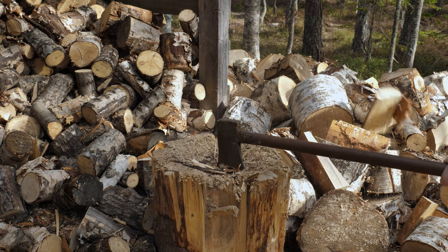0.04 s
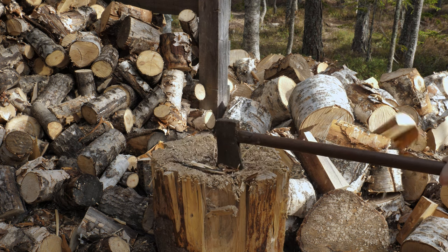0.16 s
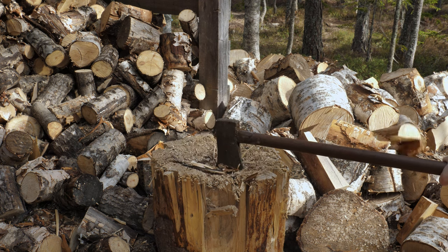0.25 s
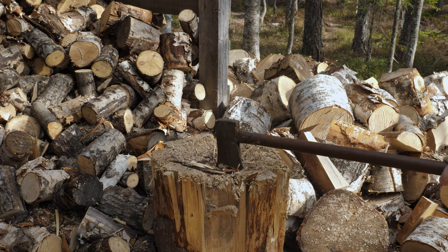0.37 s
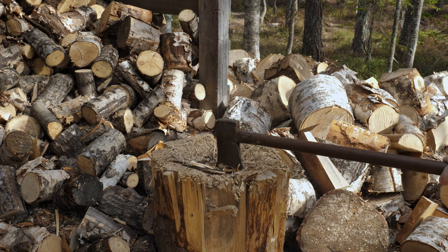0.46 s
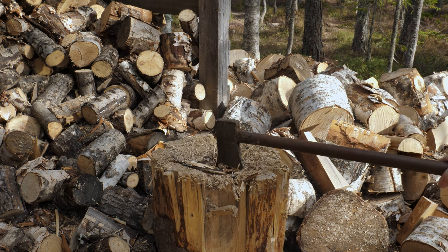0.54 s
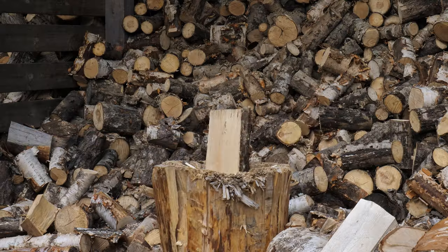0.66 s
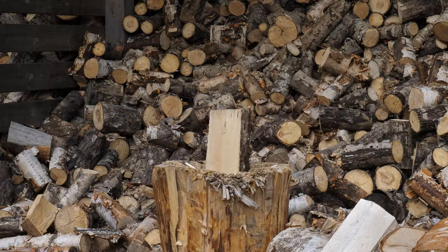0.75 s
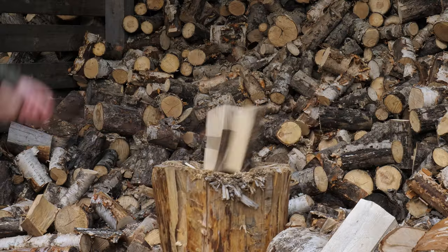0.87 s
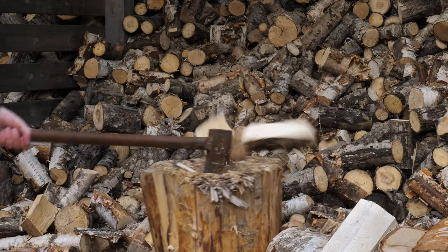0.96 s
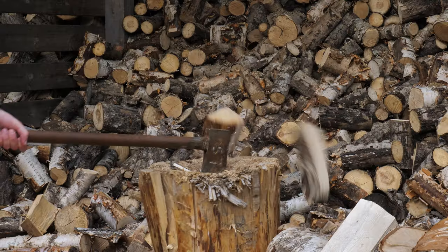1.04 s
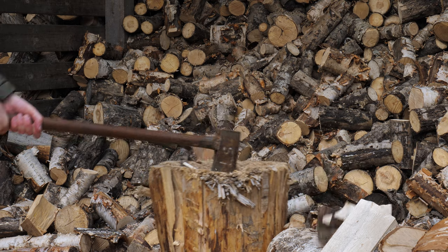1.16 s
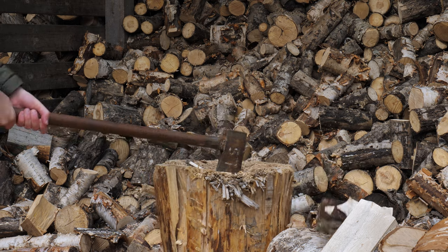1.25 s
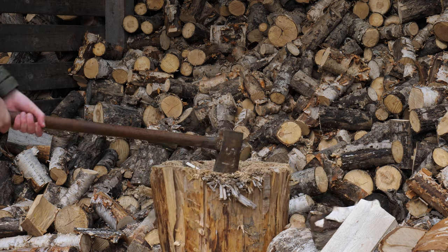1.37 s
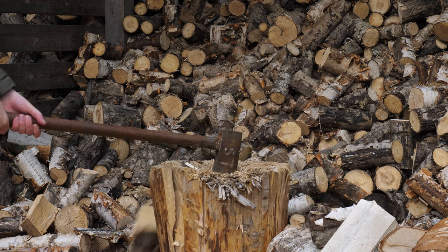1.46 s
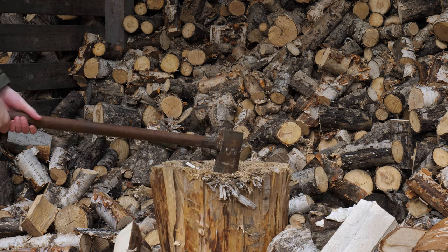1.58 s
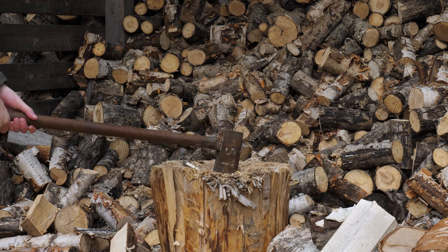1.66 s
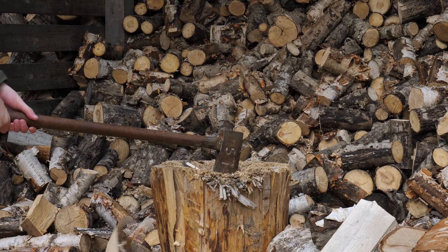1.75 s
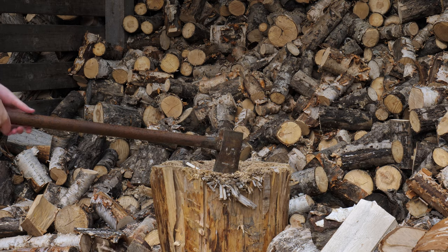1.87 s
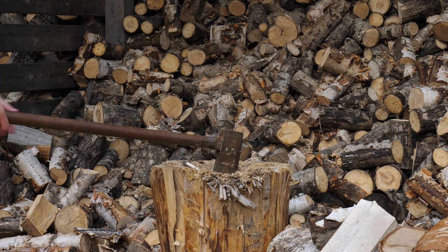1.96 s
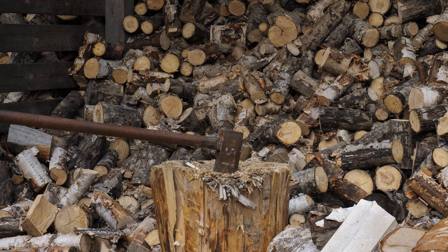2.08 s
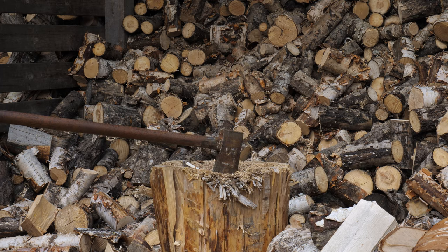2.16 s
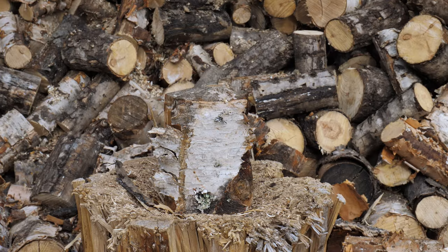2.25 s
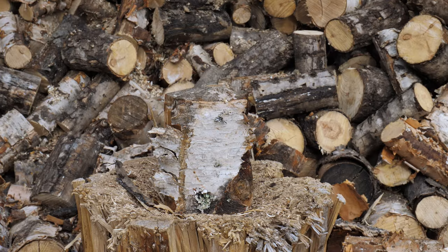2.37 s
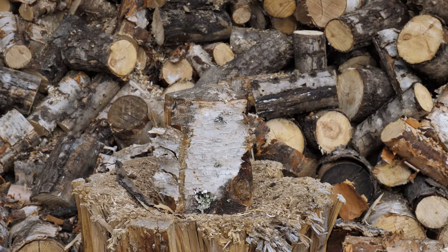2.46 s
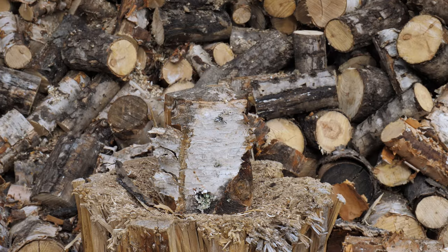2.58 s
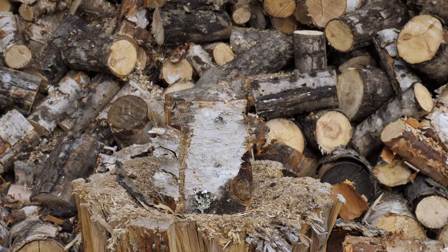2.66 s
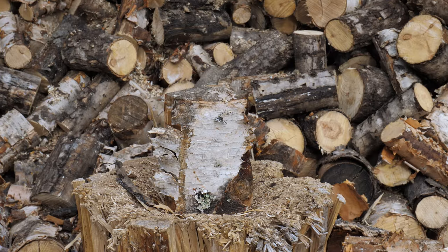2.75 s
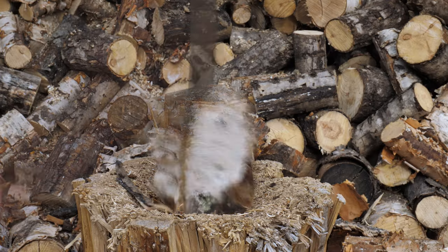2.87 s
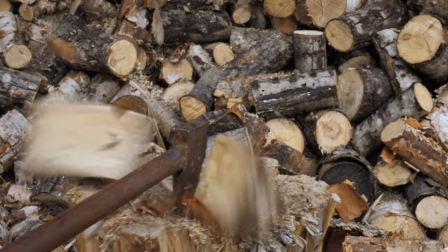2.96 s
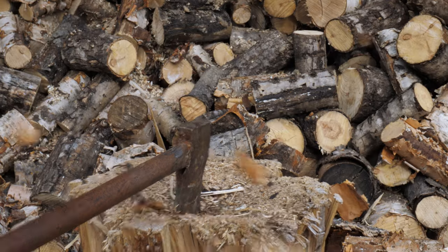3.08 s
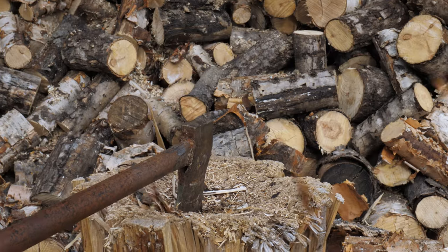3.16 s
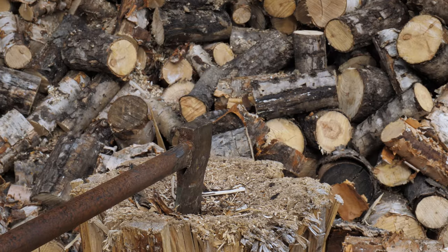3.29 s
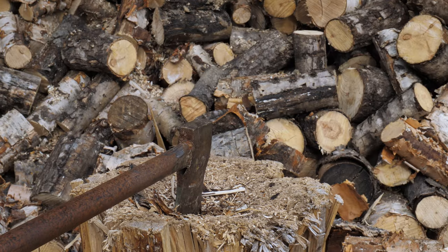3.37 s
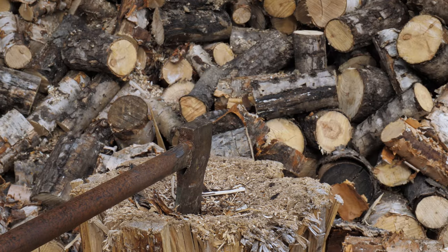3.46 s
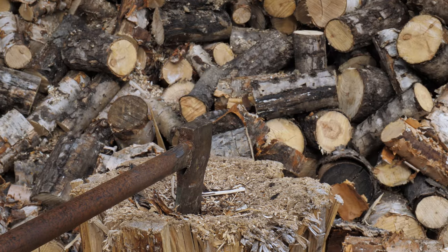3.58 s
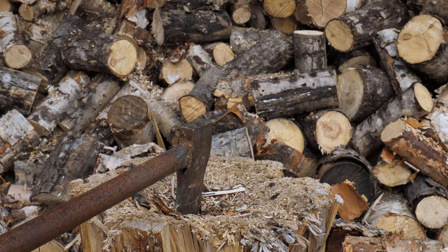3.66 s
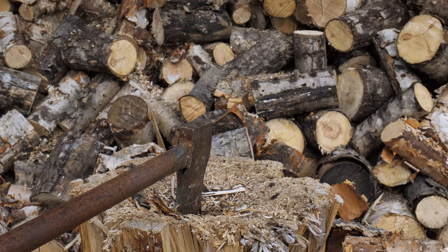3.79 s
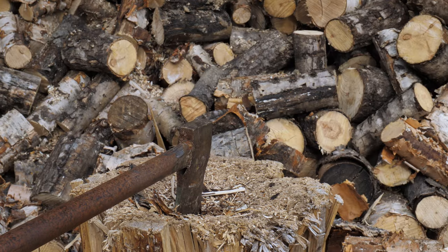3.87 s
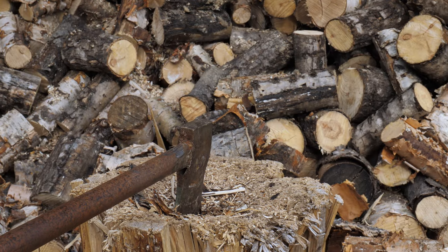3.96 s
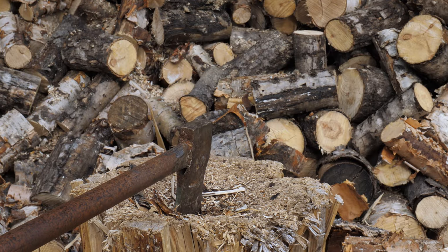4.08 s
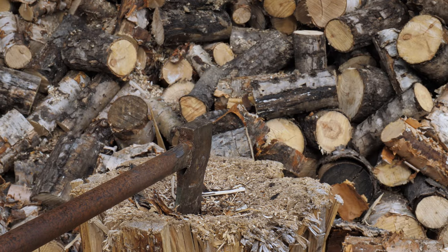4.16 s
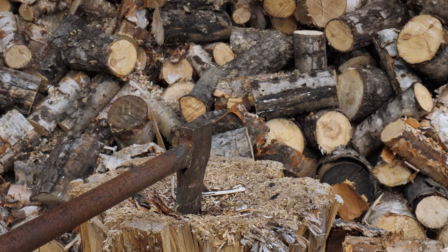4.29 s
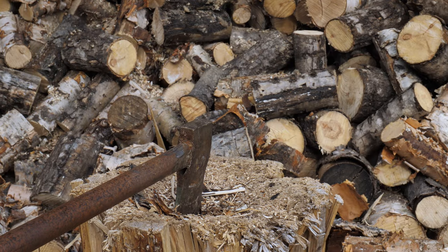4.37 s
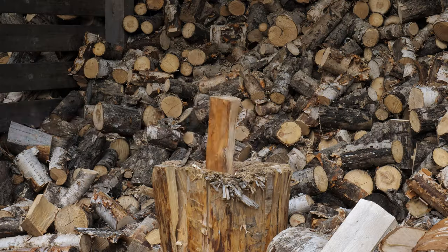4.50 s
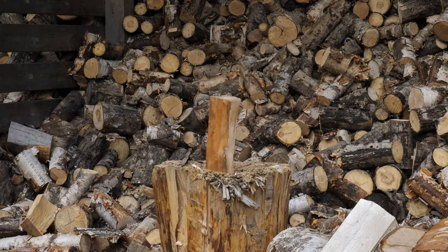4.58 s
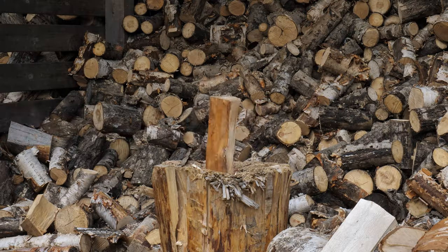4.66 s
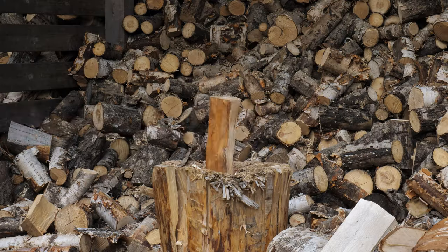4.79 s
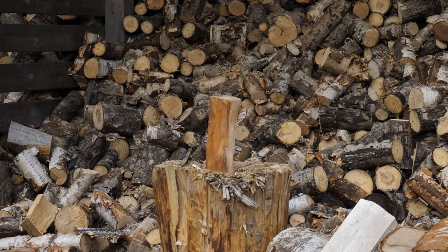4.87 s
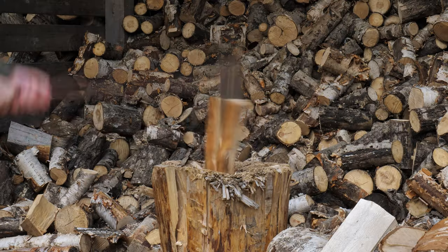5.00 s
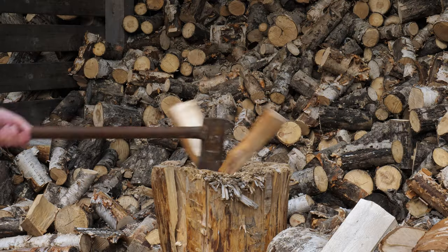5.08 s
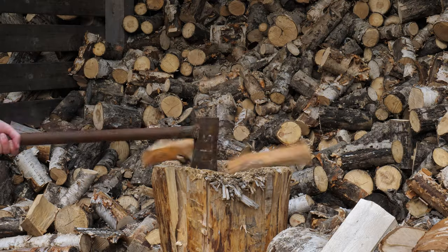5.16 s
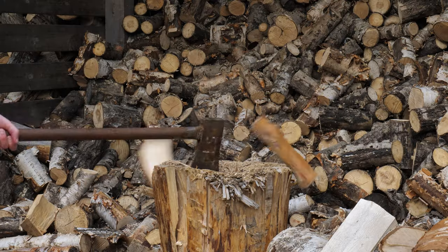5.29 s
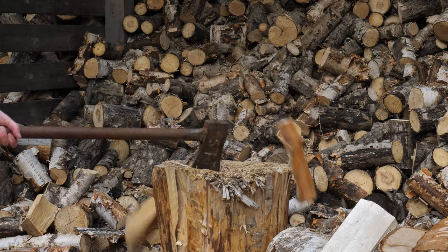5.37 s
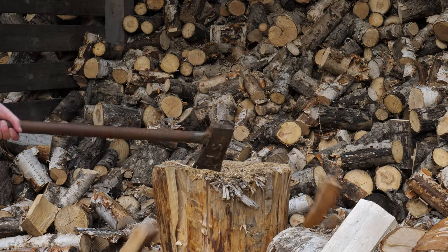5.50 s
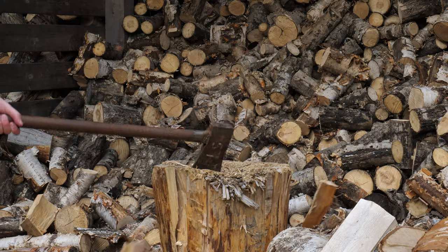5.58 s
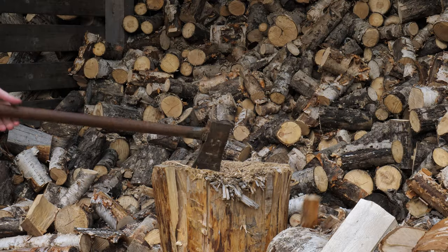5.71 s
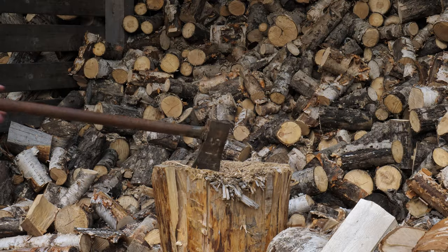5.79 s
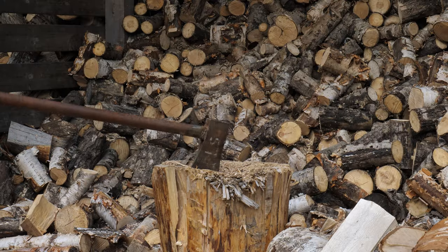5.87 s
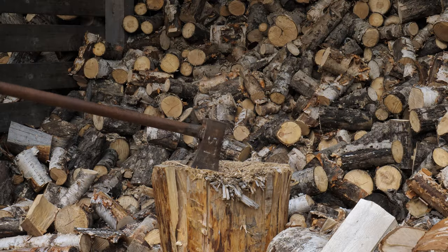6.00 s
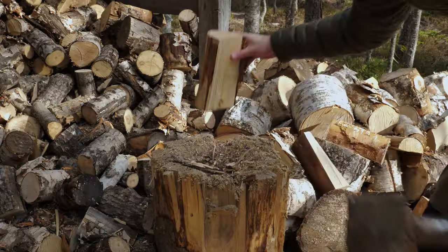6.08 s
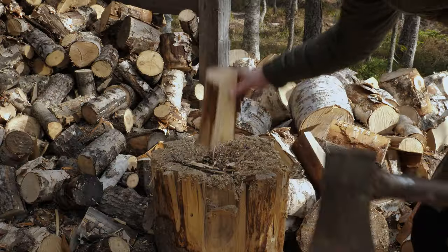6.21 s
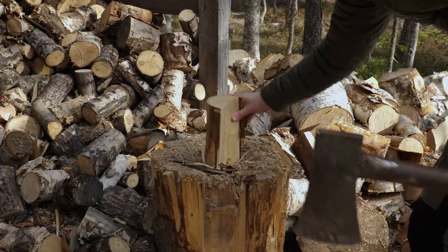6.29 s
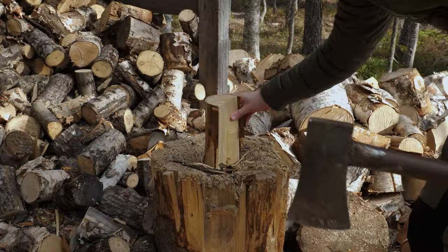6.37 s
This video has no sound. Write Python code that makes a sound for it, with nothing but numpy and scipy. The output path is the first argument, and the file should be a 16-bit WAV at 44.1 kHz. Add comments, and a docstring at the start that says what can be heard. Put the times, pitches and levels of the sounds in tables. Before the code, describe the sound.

The sound starts mid-tumble: from 0 to 0.6 s split wood knocks hollowly onto a pile, with bright chip ticks and scraping bark. At 0.7 s the background jumps to windier air. At 0.94 s an axe tears through a log with a rough crack and a low block thump, harshly overloaded; halves knock until about 1.9 s under swelling low wind buffets. From 2.26 s it is calmer, a hush rising faintly with a barely audible wavering tone. At 2.95 s comes the fiercest crack, then a loud knock at 3.3 s and dense clatter, chips and trickling bark until 4.25 s. After another change at 4.56 s, wind rumbles strongly; the third blow at 5.07 s is thumpier, its pieces knocking at 5.27 and 5.5 s. The last shot begins at 6.14 s, quieter, with one sharp clicking wooden knock at 6.33 s. Forest hush throughout, with short woodpile scatter and faint tree echoes.

```python
"""Splitting birch logs outdoors

An axe splits logs on a block, in five short shots; the halves knock and tumble on a woodpile.
Each blow cracks the log (bursts of noise), then thumps the block (low fading tones), and overloads the input.
Pieces and chips ring at their own pitches; bark trickles and scrapes as small bursts of noise.
Wind, made of slow uneven noise, buffets the microphone over a smooth forest hush."""
import sys
import numpy as np
from scipy import signal
from scipy.fft import rfft, irfft
from scipy.io import wavfile
from scipy.ndimage import uniform_filter1d

SR = 44100
rng = np.random.default_rng(int(sys.argv[2]) if len(sys.argv) > 2 else 0)


def elevation(decibels):
    """Turn decibel levels (scalar or array-like) into linear amplitude ratios."""
    levels = np.asarray(decibels, float)
    return 10 ** (levels / 20)


def log_audio(samples):
    """Write samples as a 16-bit WAV file to the path given in sys.argv[1]."""
    # one column per channel
    frames = np.atleast_2d(samples).T
    # limit to full scale, then quantise
    limited = np.clip(frames, -1, 1)
    pcm = np.round(limited * 32767).astype(np.int16)
    wavfile.write(sys.argv[1], SR, pcm)


N = 284004
T = np.arange(N) / SR  # time [s]


def colour(x, points, band_hz):
    """Shape the spectrum of x by (frequency [Hz], level [dB]) points; rms 1 within the band."""
    hz = np.maximum(np.fft.rfftfreq(len(x), 1 / SR), 1)
    point_hz, point_db = np.transpose(points)
    spectrum = rfft(x) * elevation(np.interp(np.log(hz), np.log(point_hz), point_db))
    inside = (hz > band_hz[0]) & (hz < band_hz[1])
    rms = np.sqrt(2 * np.sum(np.abs(spectrum[inside]) ** 2)) / len(x)
    return irfft(spectrum, len(x)) / rms


def walk(rate):
    """Random levels held 1 / rate s and smoothed twice; spread 1."""
    k = int(SR / rate)
    steps = np.repeat(rng.standard_normal(N // k + 1), k)
    slow = uniform_filter1d(uniform_filter1d(steps, k), k)[:N]
    return slow / slow.std()


def band(x, lo_hz, hi_hz):
    """Keep a band of frequencies, scaled to rms 1 for white noise."""
    edges = [lo_hz, min(hi_hz, 0.45 * SR)]
    y = signal.sosfilt(signal.butter(2, edges, "bandpass", fs=SR, output="sos"), x)
    return y / np.sqrt(2 * (hi_hz - lo_hz) / SR)


def lowpass(x, hz):
    """The dull part of a sound, below hz."""
    return signal.sosfilt(signal.butter(2, hz, fs=SR, output="sos"), x)


def fade(t, t60):
    """Exponential decay: 60 dB down after t60 seconds."""
    return np.exp(-np.log(1000) * np.maximum(t, 0) / t60)


def ring(t, modes, push_s):
    """Fading tones (frequency [Hz], level [dB], t60 [s]) that build up over the contact time."""
    tones = sum(elevation(db) * fade(t, t60) * np.sin(2 * np.pi * hz * t) for hz, db, t60 in modes)
    return tones * (1 - np.exp(-t / push_s))


def add(out, s, sound):
    """Mix a sound in at a time."""
    i = int(s * SR)
    out[i:i + len(sound)] += sound[:N - i]


# where one shot gives way to the next: (time [s])
CUT_TIMES = [.7, 2.262, 4.558, 6.138]
# background of each shot, one row per shot:
# (hush level at start [dB], hush level at end [dB], hush treble [dB], tree echo [dB], wind level [dB])
SHOT_LEVELS = [(-40.5, -49.5, -2.5, -47, -45.5), (-48, -54, -5.5, -30.5, -36.5),
               (-52, -49.5, 1, -43, -65.5), (-50.5, -51, -6, -37, -30), (-47, -46, -8.5, -25, -51)]


def by_shot(column):
    """One column of the shot table over time; it jumps at the cuts."""
    return np.array(SHOT_LEVELS, float)[np.searchsorted(CUT_TIMES, T), column]


# gusts of wind: (time of peak [s], half length [s], rise in level [dB])
WIND_GUSTS = [(.48, 0.16, 4.5), (1.25, 0.22, 12), (1.85, 0.35, 13.5), (2.1, 0.14, 9.5), (4.72, 0.063, 4.5),
              (5.3, 0.275, 2.5), (5.8, 0.23, 6.5), (6.36, 0.072, 11)]
# how the wind noise is spread over pitch: (frequency [Hz], level [dB per Hz])
WIND_SPECTRUM = [(12, -37), (20, 11.5), (70, 1.5), (223, -24), (375, -33), (483, -44.5), (536, -36.5),
                 (700, -42.5), (910, -76), (1540, -120)]


def wind():
    """Low turbulence on the microphone, in quick uneven buffets; gusts swell and pass within their shot."""
    buffets = rng.standard_normal(N) * elevation(0.97 * walk(9.6))
    shot = np.searchsorted(CUT_TIMES, T)
    gust_db = np.zeros(N)
    for s, half, db in WIND_GUSTS:
        same_shot = shot == np.searchsorted(CUT_TIMES, s)
        gust_db += db * np.exp(-((T - s) / half) ** 2) * same_shot
    level_db = uniform_filter1d(by_shot(column=4) + gust_db, size=600)
    return elevation(level_db) * colour(buffets, WIND_SPECTRUM, (20, 200))


# how the forest hush is spread over pitch: (frequency [Hz], level [dB per Hz])
HUSH_SPECTRUM = [(40, -36), (100, -14.5), (250, -7.5), (350, -1.5), (550, -1.5), (900, -3), (1400, -4.5),
                 (2600, -6.5), (5000, -8), (9000, -11.5), (12500, -20), (16000, -23.5)]


def forest_hush():
    """Smooth far noise that drifts through each shot and flickers slightly."""
    hush = colour(rng.standard_normal(N), HUSH_SPECTRUM, (500, 10000))
    dull = lowpass(hush, 1800)
    edges, shot = np.array([0, *CUT_TIMES, N / SR]), np.searchsorted(CUT_TIMES, T)
    through = (T - edges[shot]) / np.diff(edges)[shot]  # 0 to 1 across each shot
    level_db = by_shot(column=0) * (1 - through) + by_shot(column=1) * through
    # the hush swells shortly before the second blow, then sinks back
    level_db += np.interp(T, [2.31, 2.8, 3.25], [0, 7, 0])
    flicker_db = 1.6 * walk(25.07)
    return (dull + (hush - dull) * elevation(by_shot(column=2))) * elevation(level_db + flicker_db)


# showers of bark and chips; brightness lifts the treble and lowers the rest by as much:
# (start time [s], level [dB], length [s], brightness [dB])
BARK_SHOWERS = [(0, -35.5, 0.033, 4.5), (0.14, -40, 0.15, -1), (0.332, -32.5, 0.043, -2.5),
                (0.48, -50.5, 0.16, -2.5), (1.22, -44, 0.086, 2), (1.345, -45.5, 0.095, 2.5),
                (1.507, -45.5, 0.18, -2.5), (3.327, -39, 0.15, -4.5), (3.477, -49.5, 0.13, 5),
                (3.609, -34, 0.15, -3.5), (3.795, -49, 0.069, 5.5), (3.97, -52, 0.14, -6.5),
                (5.156, -50.5, 0.14, 7.5), (5.335, -60, 0.13, 5.5), (5.576, -45.5, 0.13, -2),
                (5.67, -57, .14, 3.5), (5.8, -51, 0.11, 7)]
# how the shower noise is spread over pitch: (frequency [Hz], level [dB per Hz])
DEBRIS_SPECTRUM = [(200, -20.5), (500, 0), (1500, 2), (4000, -2), (8000, -6), (13000, -15), (16000, -36)]


def debris():
    """Crumbs of uneven size, each a few ms of noise in its own range; brightness tilts a shower about 2 kHz."""
    rise_s, fade_t60_s = 0.017, 0.13
    crumbs_per_s = 220  # in each range
    rattle = np.zeros(N)
    for lo_hz, hi_hz in [(200, 1300), (900, 3200), (2200, 6500), (4500, 18000)]:
        landings = rng.random(N) < crumbs_per_s / SR
        crumbs = landings * elevation(4.5 * np.minimum(rng.exponential(size=N), 3))
        clacks = signal.fftconvolve(crumbs, fade(T[:1200], 0.015))[:N] * rng.standard_normal(N)
        rattle += np.sqrt(hi_hz - lo_hz) * band(clacks, lo_hz, hi_hz)
    rattle = colour(rattle, DEBRIS_SPECTRUM, (600, 10000))
    dull = lowpass(rattle, 2000)
    low, high, t = np.zeros(N), np.zeros(N), T[:SR // 2]
    for s, level_db, length, tilt_db in BARK_SHOWERS:
        shape = np.minimum(t / rise_s, 1) * fade(t - length, fade_t60_s)
        add(low, s, elevation(level_db - tilt_db) * shape)
        add(high, s, elevation(level_db + tilt_db) * shape)
    return dull * low + (rattle - dull) * high


# split pieces striking the pile; click and thud are relative to the knock:
# (time [s], level [dB], pitch [Hz], click level [dB], thud level [dB])
PIECE_KNOCKS = [(0.002, -16, 426, -1.5, -9), (0.111, 3.5, 1079, -10, -16.5), (0.128, -15.5, 630, -19, -25),
                (0.186, -9.5, 613, -4, -16.5), (0.22, -16, 707, 2.5, -31), (0.233, -12.5, 1700, -6, -15),
                (0.262, -20.5, 633, -1.5, -33), (0.287, -22, 520, -3, -24.5),
                (0.302, -6.5, 2350, -23.5, -24), (0.314, -11, 1700, -8, -22), (0.395, -31.5, 920, 13, -8),
                (0.423, -25.5, 960, 4, -16), (0.473, -35, 1270, 1.5, -21), (0.611, -31.5, 401, 0.5, -0.5),
                (1.069, -5, 594, -24.5, -37), (1.235, -1.5, 831, -20.5, -14.5), (1.297, -11, 738, -24, -15),
                (1.37, -14.5, 810, -17.5, -8), (1.477, -26, 374, -8, -16), (1.622, -8.5, 571, -16, -7.5),
                (1.867, -38.5, 900, -3.5, 1), (1.924, -32, 547, -5, -12.5), (3.261, -8.5, 517, -7.5, 4),
                (3.31, 9, 804, -11, -12.5), (3.349, -37, 662, -11, -6), (3.436, -13, 390, -13, -2),
                (3.453, -36, 550, 4, -6), (3.501, -22.5, 700, -24, -14), (3.557, -10.5, 1442, -14, -30),
                (3.564, -27, 173, -18.5, 1.5), (3.595, -17, 2290, -14, -30), (3.642, -32, 1030, -19, -33),
                (3.654, -21.5, 1280, -12, -8), (3.752, -17.5, 620, -9.5, -11.5), (3.839, -25, 445, -4, -33),
                (3.981, -34, 1090, 2, -8), (4.033, -17.5, 693, -10.5, -42), (4.244, -20, 1670, -4.5, -11),
                (4.257, -24.5, 1550, 7, -36), (5.241, -25.5, 905, -14, 3), (5.269, -3, 1090, -20, -19),
                (5.483, -11, 550, -5.5, -5.5), (5.547, -25, 555, 4, -6), (5.59, -11, 602, -0.5, -9),
                (5.878, -19.5, 716, -21, -12.5), (6.335, -13.5, 579, 5.5, 0.5)]
# tones of one wooden piece: (pitch ratio, level [dB], share of the ring time)
PIECE_TONES = [(1, 7, 0.45), (.72, -3.5, 0.94), (1.38, -1, 0.51), (1.9, -12, 0.56), (2.3, -5, 0.34),
               (2.7, -11.5, 0.48), (3.9, -17, 0.29)]
# tones of the woodpile underneath: (frequency [Hz], level [dB], t60 [s])
PILE_TONES = [(87.5, -5.5, .1), (164, 5, 0.042), (234, 5, 0.038), (346.4, 1, 0.059)]


def knocks():
    """Each piece rings at its own pitch after a click; the pile under it answers a moment later."""
    out, t = np.zeros(N), T[:SR // 4]
    rise = 1 - np.exp(-t / 0.0018)
    for s, level_db, hz, click_db, thud_db in PIECE_KNOCKS:
        t60 = 0.042 * (700 / hz) ** 0.64  # higher pieces die sooner
        detune = 1 + 0.095 * rng.standard_normal(len(PIECE_TONES) + len(PILE_TONES))
        noise = rng.standard_normal((2, len(t)))
        piece = [(hz * ratio * (1 if ratio == 1 else d), db, t60 * share)
                 for (ratio, db, share), d in zip(PIECE_TONES, detune)]
        # the first swings, still in contact, are the strongest
        body = ring(t, piece, 0.0027) * (fade(t, 0.049) + elevation(-6.5))
        body = body / np.abs(body).max()
        # rough bark rattles on
        grit = elevation(-11.5) * band(noise[0], 0.76 * hz, 1.72 * hz) * fade(t, 1.73 * t60)
        click_shape = fade(t, 0.014) + elevation(-15.5) * fade(t, 2.9 * t60)
        click = elevation(click_db) * band(noise[1], 2800, 7000) * click_shape
        pile = [(f * d, db, ring_s) for (f, db, ring_s), d in zip(PILE_TONES, detune[::-1])]
        thud = elevation(thud_db) * ring(t, pile, 0.0047)
        add(out, s, elevation(level_db) * (body + rise * (grit + click)))
        add(out, s + 0.003, elevation(level_db) * thud)
    return out


def tail(x, lo_hz, hi_hz, t60, build_s):
    """Blurred echoes: x smeared by a band of noise that builds and dies, of unit energy."""
    t = T[:SR]
    echoes = band(rng.standard_normal(len(t)), lo_hz, hi_hz) * fade(t, t60) * (1 - np.exp(-t / build_s))
    return signal.fftconvolve(x, echoes / np.sqrt(np.sum(echoes ** 2)))[:N]


def surroundings(near):
    """The pile scatters sound briefly, the trees answer longer, at each shot's level, the ground rumbles on."""
    pile = elevation(-21.5) * tail(near, 270, 3800, t60=0.12, build_s=0.0022)
    trees = elevation(by_shot(column=3)) * tail(near, 720, 2100, t60=0.75, build_s=0.01)
    ground = elevation(-31.5) * tail(near, 70, 260, t60=0.49, build_s=0.01)
    return pile + trees + ground


# chips and splinters snapping or landing; noise is relative to the tone:
# (time [s], level [dB], pitch [Hz], ring t60 [s], noise level [dB])
CHIP_TICKS = [(0.0208, -17, 3700, 0.011, -7), (0.0707, -23.5, 3320, 0.0073, -14),
              (0.1585, -19.5, 3420, 0.0097, -6.5), (0.2173, -11.5, 4020, 0.011, -4),
              (0.262, -16, 2550, 0.016, -11.5), (0.2857, -9.5, 2250, 0.0076, -10.5),
              (0.4863, -36, 4000, 0.017, 3.5), (1.1887, -32.5, 4510, 0.0061, -2),
              (1.4426, -29.5, 3880, 0.018, -14), (1.5324, -43, 2870, 0.034, -14),
              (1.5872, -28.5, 3210, 0.0093, 2.5), (1.686, -39, 4490, .01, 0), (1.783, -46.5, 9000, .01, 4),
              (1.857, -45.5, 9500, .01, 4.5), (3.0898, -32, 3130, 0.016, -2),
              (3.1236, -27, 3120, 0.0028, 5), (3.262, 6.5, 2650, 0.006, -5),
              (3.3811, -24.5, 2630, 0.012, 1), (3.3914, -32, 2380, 0.01, -6),
              (3.4317, -21, 2770, 0.0029, 9), (3.4724, -25, 8400, 0.0073, -4),
              (3.5275, -29.5, 2820, 0.012, -4.5), (3.5551, -10.5, 2500, 0.0082, -4.5),
              (3.6041, -20, 4380, 0.01, -3), (3.706, -24, 2800, 0.0067, 16),
              (3.7243, -27.5, 3600, 0.01, -2), (3.7335, -23.5, 3680, 0.012, 8.5),
              (3.9215, -28.5, 4780, 0.012, -9), (4.0954, -17.5, 2950, 0.0041, -16.5),
              (4.198, -43, 3860, 0.016, 2), (5.2689, -2.5, 2655, 0.0083, -12),
              (5.4881, -23, 2420, 0.067, -8), (5.5091, -16, 8200, 0.0069, -2),
              (5.826, -28, 4690, 0.015, 3.5), (5.9259, -40.5, 8160, 0.008, 2),
              (6.1479, -44, 2600, 0.021, 5.5), (6.333, 0.5, 4630, 0.014, -0.5)]


def ticks():
    """Small dry chips: a high tone with a weaker one above it, and a spit of noise around them."""
    out, t = np.zeros(N), T[:SR // 8]
    spit_shape = fade(t, 0.011) * (1 - np.exp(-t / 0.0015))
    for s, level_db, hz, t60, spit_db in CHIP_TICKS:
        spit = band(rng.standard_normal(len(t)), 0.36 * hz, 2.0 * hz) * spit_shape
        tones = ring(t, [(hz, 0, t60), (1.3 * hz, -5, 0.25 * t60)], 0.00028)
        add(out, s, elevation(level_db) * (tones + elevation(spit_db) * spit))
    return out


# pieces sliding on bark, and a few short bright ticks:
# (time [s], level [dB], resonance [Hz], swell [s], fade t60 [s])
SCUFFS_AND_TICKS = [(0.102, -24.5, 2630, 0.0024, 0.045), (0.194, -23, 2000, .025, 0.3),
                    (.365, -31.5, 1560, 0.019, 0.13), (1.2146, -27.5, 4540, 0.0013, 0.017),
                    (3.052, -20.5, 2030, .02, 0.042), (3.66, -32.5, 1540, 0.024, 0.13),
                    (4.234, -33, 1400, 0.037, 0.049), (5.536, -26, 1710, .012, 0.16),
                    (5.596, -25.5, 1990, 0.0042, 0.048), (5.867, -29.5, 1256, 0.0047, 0.075),
                    (6.328, -30, 2970, 0.0105, 0.076), (6.40, -39.5, 1430, 0.015, 0.11)]


def scuffs_and_short_ticks():
    """A rough hiss that swells and dies around a broad resonance: wood sliding, or a tick if very short."""
    out, t = np.zeros(N), T[:SR // 4]
    for s, level_db, hz, swell, t60 in SCUFFS_AND_TICKS:
        noise = rng.standard_normal((3, len(t)))
        rough = elevation(3.0 * uniform_filter1d(noise[2], size=70) * np.sqrt(70))
        shape = np.minimum(t / swell, 1) ** 2 * fade(t - swell, t60) * rough
        hiss = band(noise[0], 0.37 * hz, 1.32 * hz) + elevation(-8) * band(noise[1], 2100, 11000)
        add(out, s, elevation(level_db) * shape * hiss)
    return out


# fibres tearing as the blade goes through; splinters are relative to the log:
# (time [s], drive level [dB], fade t60 [s], log pitch [Hz], splinter level [dB])
LOG_CRACKS = [(0.938, 2, 0.068, 1128, -4.5), (2.948, 8, 0.044, 515, -6.5), (2.960, 2, 0.048, 1260, -8.5),
              (5.071, -4, .05, 1167, 1), (5.093, -13, 0.035, 1736, 0), (5.105, -17, 0.1, 894, -3.5)]


def cracks():
    """Tearing fibres drive the broad resonance of the log and spit splinters."""
    out, t = np.zeros(N), T[:SR // 2]
    tear_s = 0.0067  # full tearing before the fade
    rise = 1 - np.exp(-(t / 0.00048) ** 2)
    for s, drive_db, t60, hz, splinter_db in LOG_CRACKS:
        noise = rng.standard_normal((3, len(t)))
        # fibres give way unevenly
        jerks = elevation(4.22 * uniform_filter1d(noise[2], size=60) * np.sqrt(60))
        # the last strands part more quietly
        tearing = fade(t - tear_s, t60) + elevation(-25.5) * fade(t - tear_s, 0.27)
        log = band(noise[0], 0.51 * hz, 1.42 * hz)
        splinters = elevation(splinter_db) * band(noise[1], 1400, 7700)
        add(out, s, elevation(drive_db) * rise * jerks * tearing * (log + splinters))
    return out


# the blade lands on the block; hardness lifts the higher tones:
# (time [s], drive level [dB], ring t60 [s], hardness [dB per octave])
BLOCK_THUMPS = [(0.943, 1.5, 0.088, 3.5), (0.959, 4.5, 0.11, 3), (2.950, -2.5, 0.1, 8),
                (2.976, -8, 0.099, 14), (2.982, -4.5, 0.14, 6.5), (5.072, 7, 0.1, 6), (5.119, 2.5, 0.11, 2)]
# tones of the block, before hardness is added: (frequency [Hz], level [dB], share of the ring time)
BLOCK_TONES = [(143.5, 4.5, 0.67), (192, -5.5, 0.63), (255, -3.5, .45), (297.6, -10, 0.77),
               (419, -11, 0.38), (527.4, -14.5, 0.29), (660, -20, 0.06)]


def thumps():
    """The struck block rings low; a harder blow brings out its higher tones."""
    out, t = np.zeros(N), T[:SR // 2]
    lowest_hz = BLOCK_TONES[0][0]
    for s, drive_db, t60, hard_db in BLOCK_THUMPS:
        modes = [(hz, db + hard_db * np.log2(hz / lowest_hz), share * t60) for hz, db, share in BLOCK_TONES]
        add(out, s, -elevation(drive_db) * ring(t, modes, 0.006))
    return out


# loose logs ringing on after a hit, and one long, very deep tone after the second blow:
# (time [s], frequency [Hz], level [dB], t60 [s])
AFTER_RINGS = [(1.665, 880, -37, 0.14), (1.866, 873, -41.5, 0.11), (2.97, 47.6, -45, 2.6),
               (3.44, 306, -18, 0.16), (3.44, 568, -26, .12), (5.285, 874, -25, .08)]


def after_rings():
    """Single fading tones, each building up over about one and a half swings."""
    out, t = np.zeros(N), T[:int(1.55 * SR)]
    for s, hz, db, t60 in AFTER_RINGS:
        add(out, s, ring(t, [(hz, db, t60)], 1.5 / hz))
    return out


def far_tone():
    """A faint, short tone that climbs while its pitch and level waver."""
    span_s = (2.29, 2.75)  # start and end
    hz = np.interp(T, span_s, (480, 537)) * (1 + 0.04 * walk(60))
    phase = 2 * np.pi * np.cumsum(hz) / SR
    gate = np.clip(np.minimum(T - span_s[0], span_s[1] - T) / 0.018, 0, 1)
    level_db = np.interp(T, span_s, (-57, -54)) + 3.2 * walk(39.7)  # rms
    return np.sqrt(2) * gate * elevation(level_db) * np.sin(phase)


def scene():
    """Add the wood sounds, what the surroundings send back, and the background."""
    near = cracks() + thumps() + knocks() + ticks() + scuffs_and_short_ticks()
    answers = surroundings(near) + after_rings()
    background = debris() + wind() + forest_hush() + far_tone()
    return (near + answers + background)[None]


# treble response of the microphone: (frequency [Hz], level [dB])
MICROPHONE_RESPONSE = [(4500, 0), (6200, -4), (8000, 2), (9800, -2.5), (12000, -0.5)]


def microphone(x):
    """Dips and a peak in the treble."""
    hz = np.fft.rfftfreq(N, 1 / SR)
    return irfft(rfft(x) * elevation(np.interp(hz, *np.transpose(MICROPHONE_RESPONSE))), N)


def overload(x):
    """The input clips; its coupling lets flat tops sag and sheds deep bass; then the converter clips."""
    x = np.clip(x, -1.1, 1.1)
    x = signal.sosfilt(signal.butter(1, 75, "highpass", fs=SR, output="sos"), x)
    x = signal.sosfilt(signal.butter(2, 24, "highpass", fs=SR, output="sos"), x)
    return np.clip(x, -1, 1)


def roll_off(x):
    """The treble ends steeply here."""
    return signal.sosfilt(signal.butter(12, 16240, fs=SR, output="sos"), x)


def record(dry):
    """Pick the scene up with the microphone and its overloaded input."""
    mix = overload(microphone(dry))
    return roll_off(mix)


dry = scene()
out = record(dry)
log_audio(out)
```